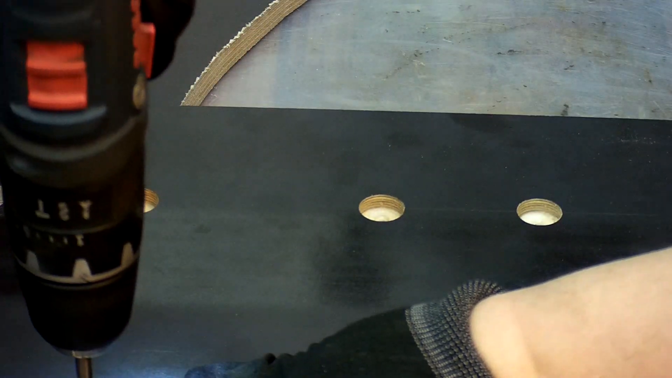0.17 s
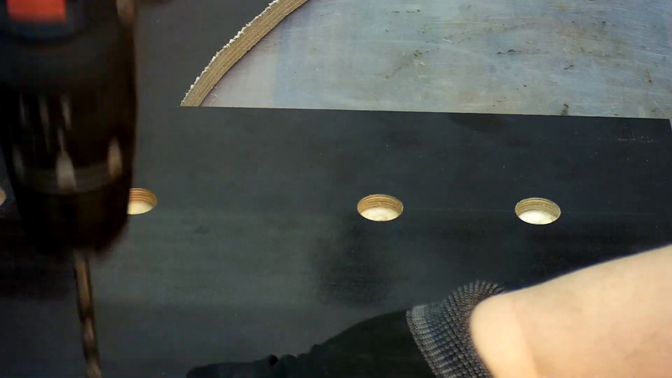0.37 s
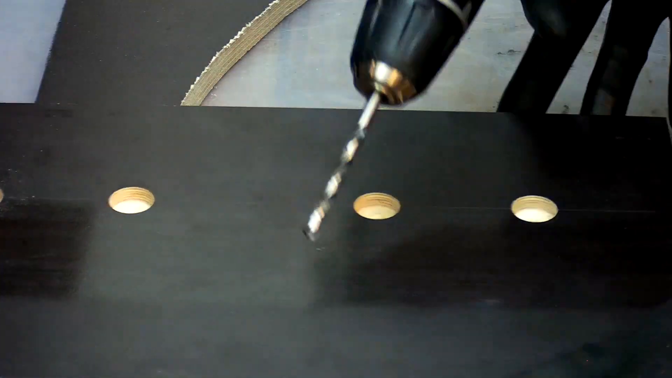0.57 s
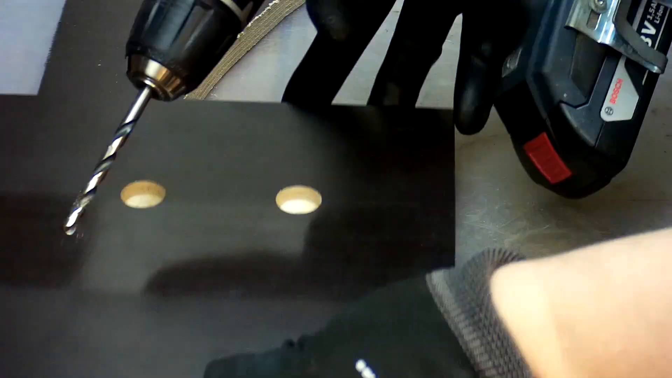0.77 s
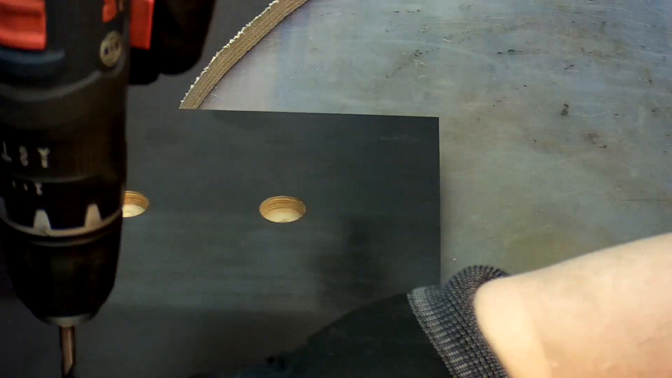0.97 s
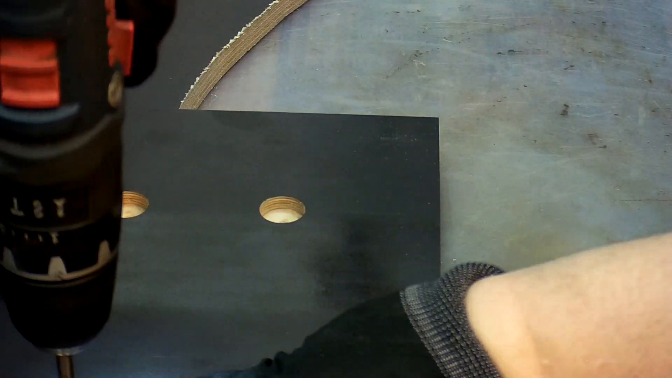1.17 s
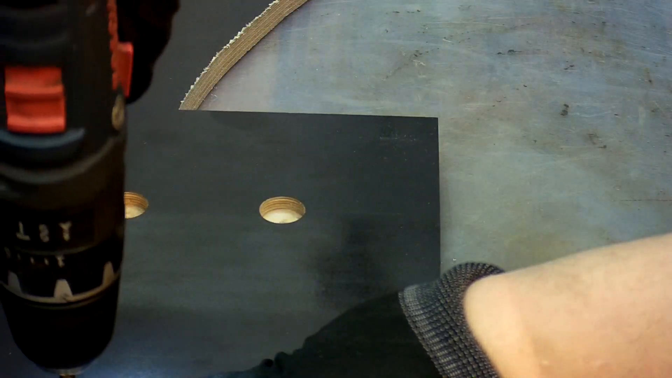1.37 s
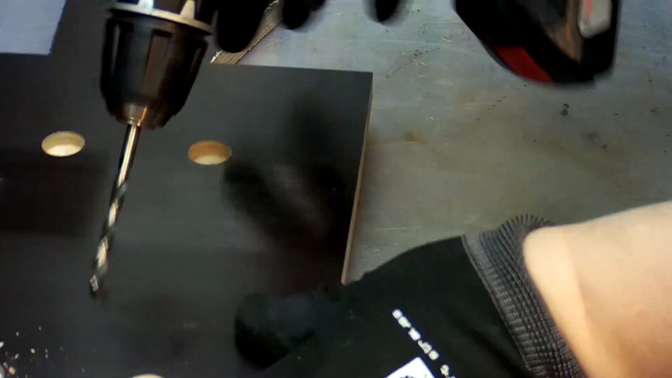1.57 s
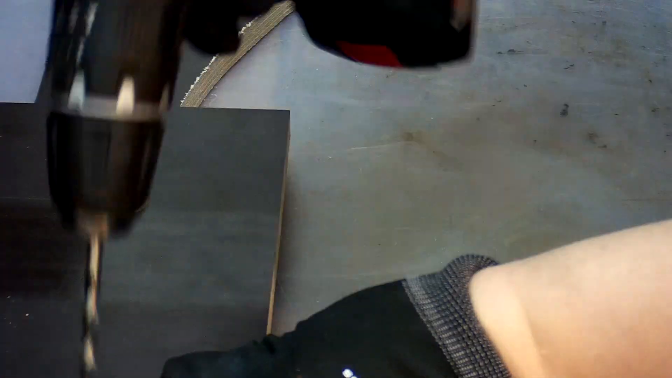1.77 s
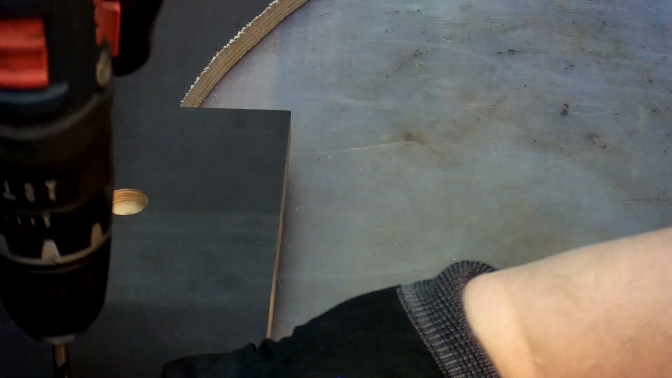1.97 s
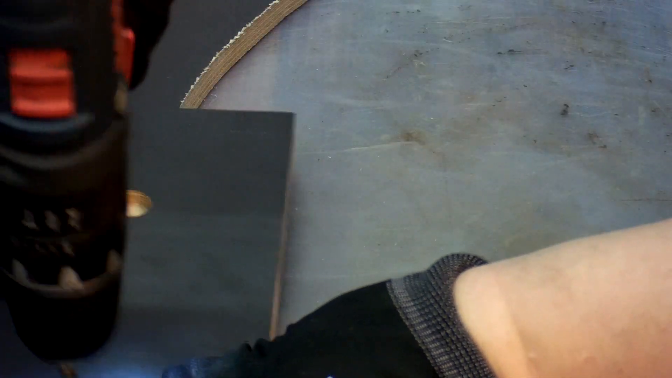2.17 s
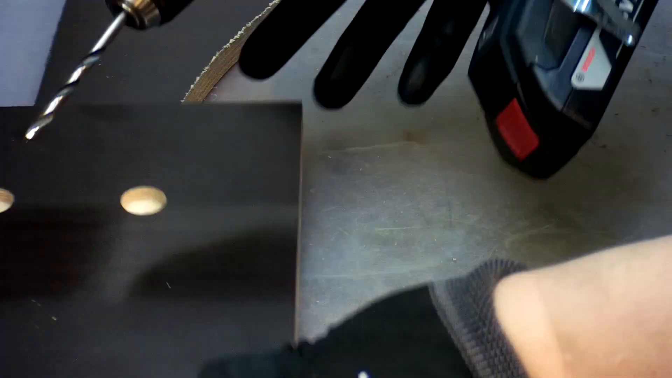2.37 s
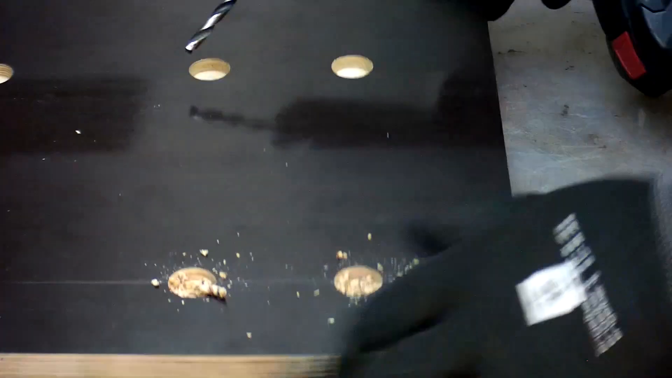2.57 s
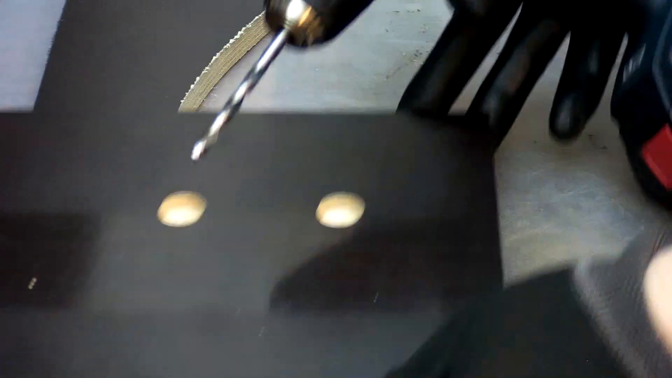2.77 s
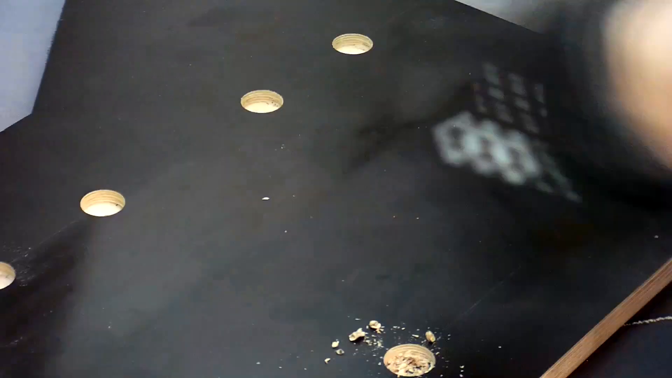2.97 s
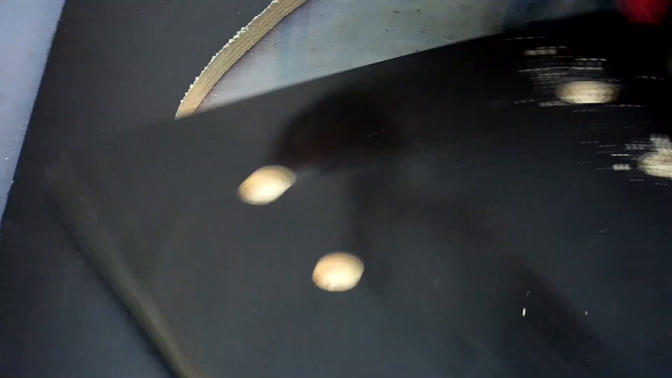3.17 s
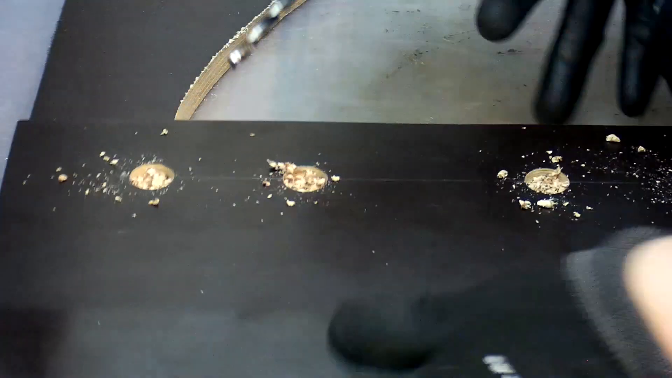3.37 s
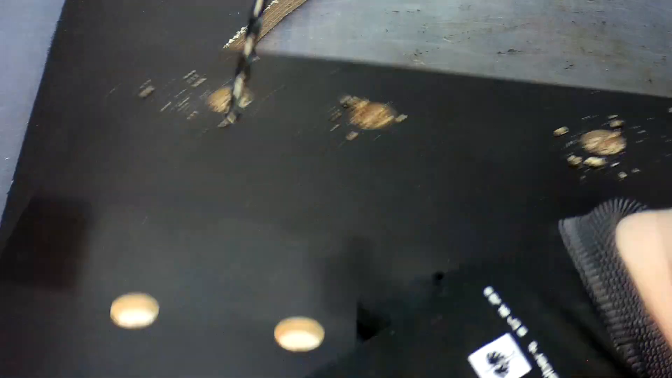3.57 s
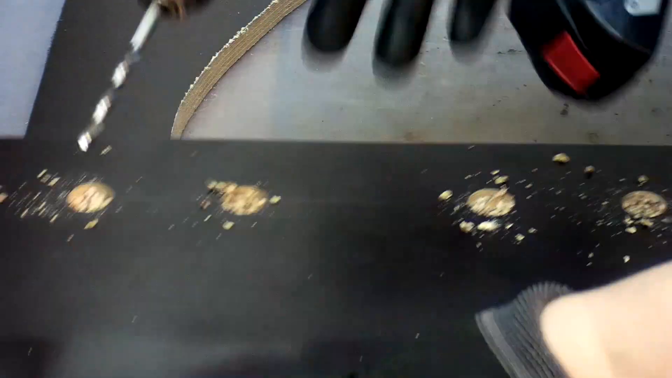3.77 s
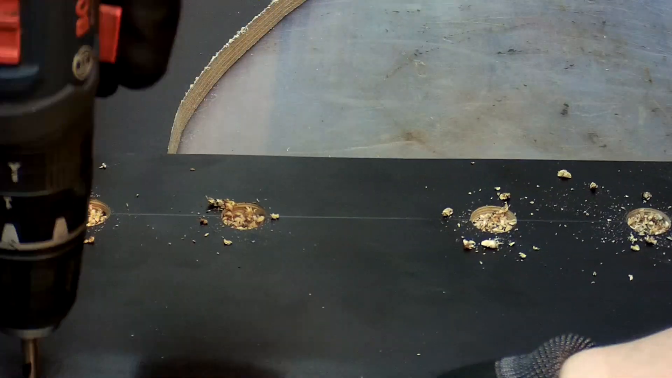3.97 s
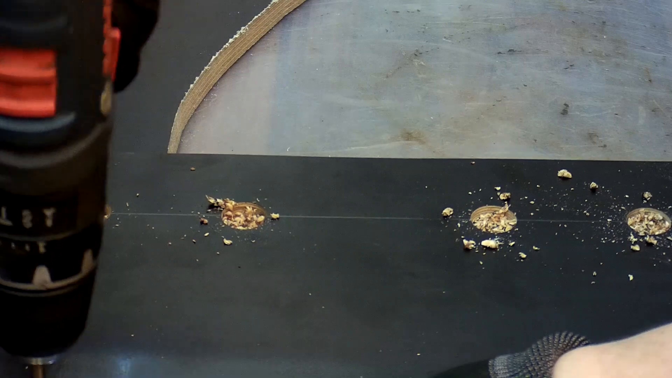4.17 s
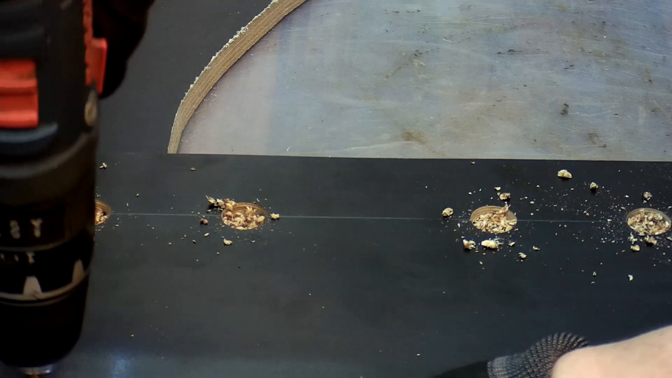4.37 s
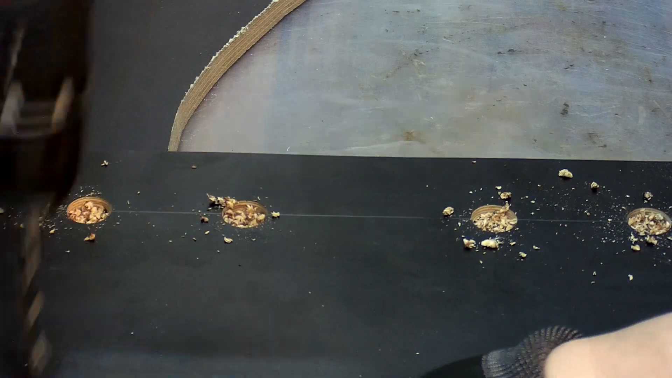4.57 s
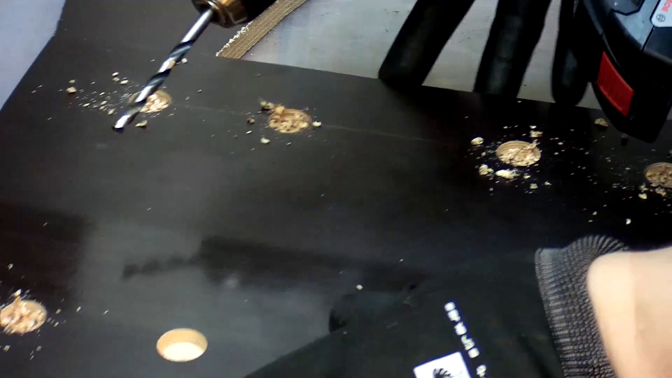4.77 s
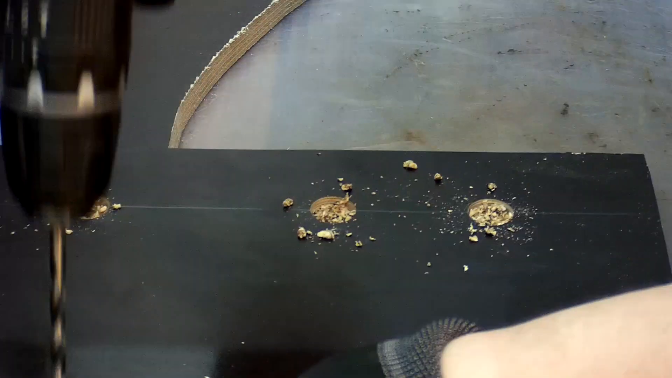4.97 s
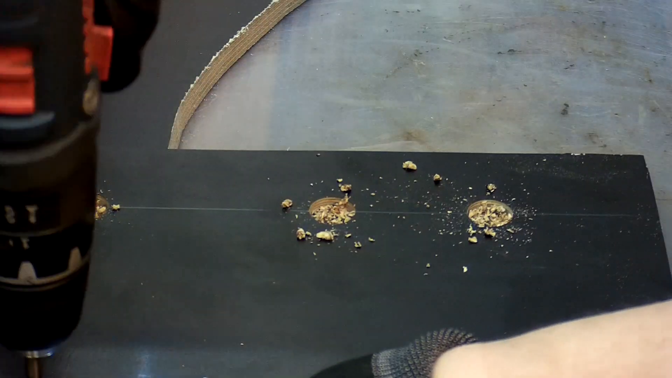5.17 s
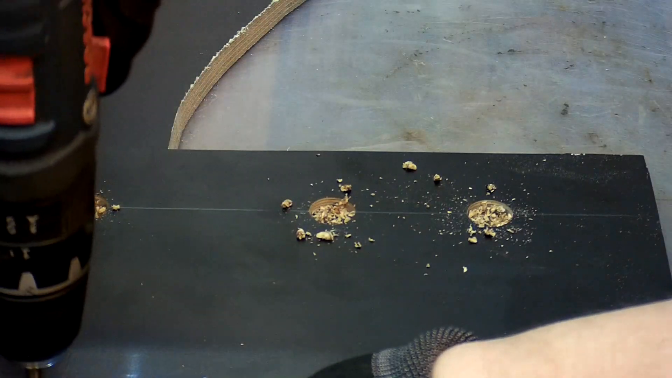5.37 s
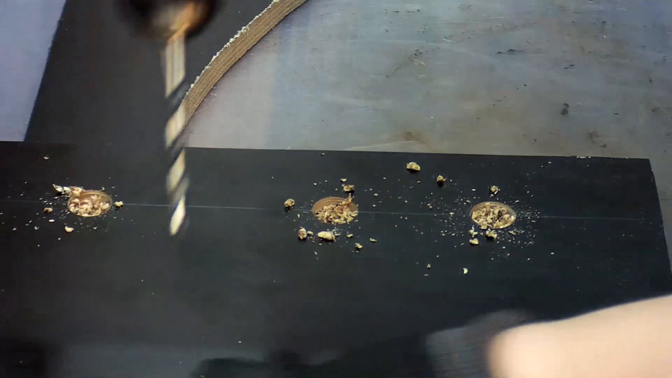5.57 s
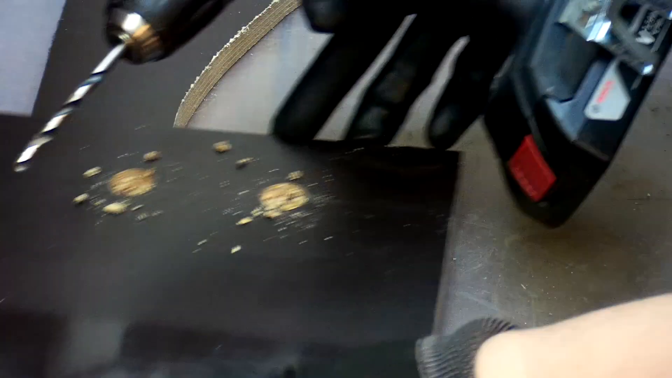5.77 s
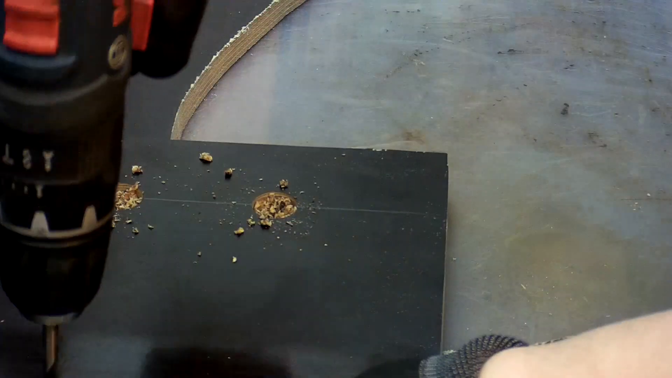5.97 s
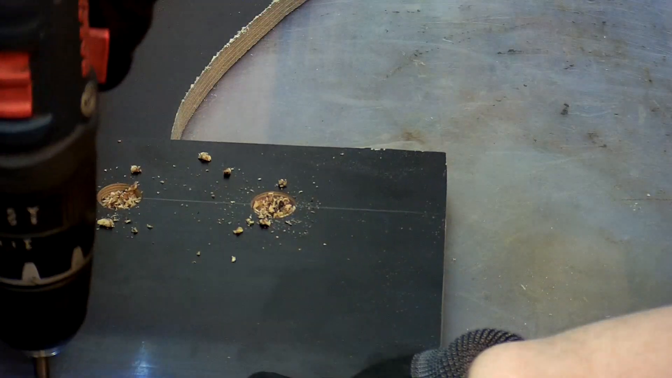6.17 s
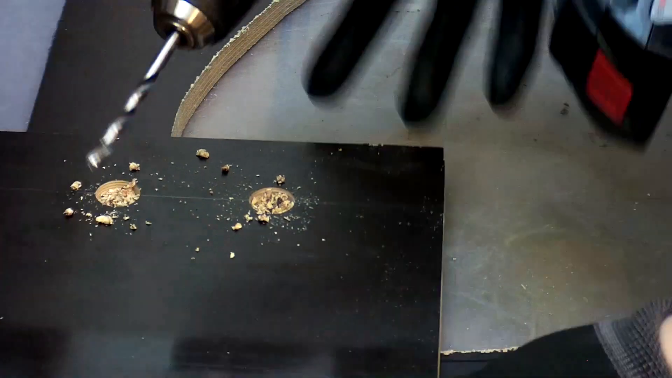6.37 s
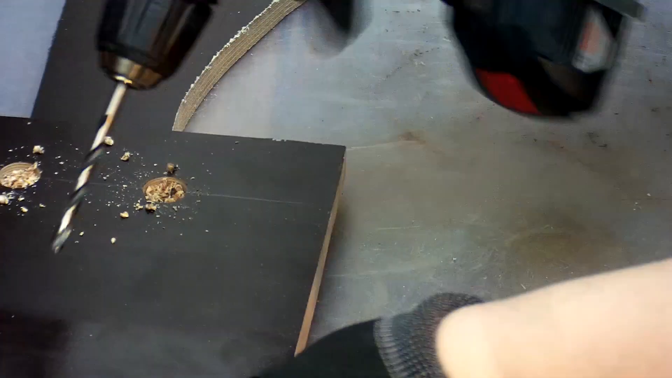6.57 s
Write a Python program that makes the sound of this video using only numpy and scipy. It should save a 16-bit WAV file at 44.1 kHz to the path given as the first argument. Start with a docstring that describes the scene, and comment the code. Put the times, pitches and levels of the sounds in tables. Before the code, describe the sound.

A cordless drill bores six holes in plywood on a steel bench, close to one microphone over faint workshop air. Each burst lasts under half a second: the gears whine and sag in pitch, fibres tear with a bright hiss, and the bit catches with dry clacks. The first three bursts come at the very start, at 1.1 and at 2.0 seconds, with light knocks and short scrapes between them and a hard knock at 2.2. From about 2.4 to 3.8 seconds the board is shuffled over the steel with knocks and gritty slides, its edge screeching briefly around 2.9 and 3.2 seconds. Three more bursts follow at 4.2, 5.2 and 6.1 seconds, separated by soft scrapes. Two quick slides around 6.5 seconds lead to a last hard knock at 6.6. The sound is dry, with very little room echo.

```python
"""Over quiet workshop air, a cordless drill bores six holes in plywood on a steel bench, in quick succession.
In each short burst the bit catches, the gears whine and sag under load, and tearing fibres ring the board and
bench until the bit breaks through. Between holes the board is knocked and slid over the steel. After the third
hole comes a longer shuffle, where its edge sticks and slips in brief screeches. Three more holes follow, then
two quick slides and a last hard knock, all close to one microphone."""
import sys
import numpy as np
from scipy import signal
from scipy.fft import rfft, irfft, next_fast_len
from scipy.io import wavfile
from scipy.ndimage import uniform_filter1d

SR = 44100
rng = np.random.default_rng(int(sys.argv[2]) if len(sys.argv) > 2 else 0)


def master_out(mix):
    """Clip the mix to full scale and print it as 16-bit PCM to the path in sys.argv[1]."""
    frames = np.transpose(np.atleast_2d(mix))
    ceiling = np.clip(frames, -1, 1)
    pcm = np.round(ceiling * 32767).astype(np.int16)
    wavfile.write(sys.argv[1], SR, pcm)


N = 295470


def amp(db):
    """Decibels to gain."""
    return 10 ** (np.asarray(db) / 20)


def unit(x):
    """Scale to rms 1."""
    return x / np.sqrt(np.mean(x ** 2) + 1e-20)


def eq_curve(points, hz):
    """EQ gain in dB: breakpoints joined on a log frequency axis."""
    point_hz, point_db = np.transpose(points)
    return np.interp(np.log(hz + 1), np.log(point_hz), point_db)


def bell(hz, centre_hz, width_hz):
    """Power response of one resonance."""
    return 1 / (1 + (2 * (hz - centre_hz) / width_hz) ** 2)


def resonant(modes, hz):
    """Response in dB of resonances standing on a flat base."""
    return 10 * np.log10(1 + sum(amp(db) ** 2 * bell(hz, centre, width) for centre, width, db in modes))


def colour(x, gain_db):
    """Minimum-phase EQ; gain_db is a function of frequency."""
    size = 2 * next_fast_len(len(x) // 2 + 4096)
    cepstrum = irfft(np.log(amp(gain_db(np.fft.rfftfreq(size, 1 / SR))) + 1e-6))
    cepstrum[1:size // 2] *= 2
    cepstrum[size // 2 + 1:] = 0
    return irfft(rfft(x, size) * np.exp(rfft(cepstrum)))[:len(x)]


def wobble(rate):
    """Smooth random modulation, rate knots a second."""
    knots = rng.standard_normal(int(N * rate / SR) + 4)
    curve = signal.resample(knots, len(knots) * 8)
    return np.interp(np.arange(N) * rate / SR * 8, np.arange(len(curve)), curve)


def ramp(t, start, length):
    """Rises from 0 to 1 over length seconds."""
    return np.clip((t - start) / length, 0, 1)


def grains(rate, spread_db):
    """Tiny snaps of uneven size, about rate a second."""
    chance, size, sign = rng.random(N), rng.exponential(size=N), rng.standard_normal(N)
    return unit((chance < rate / SR) * amp(spread_db * np.minimum(size, 4)) * np.sign(sign))


def patchy(x, depth_db):
    """Narrow resonances that come and go as the point of contact moves."""
    spectrum = signal.stft(x, nperseg=512)[2]
    patches = uniform_filter1d(rng.standard_normal(spectrum.shape), size=3, axis=0)
    patches = uniform_filter1d(patches, size=18, axis=1)
    return unit(signal.istft(spectrum * amp(depth_db * unit(patches)), nperseg=512)[1][:N])


# room tone EQ: f/Hz, level/dB
AIR_EQ = [(12, -47), (20, -12.5), (145, -10.5), (181, -7), (268, -8.5), (355, -6.5), (496, -6.5),
          (754, -8.5), (819, -8), (1210, -9.5), (15800, -30.5)]


def air():
    """The bed: a steady room rush with a faint hollow tone."""
    tone_db = lambda hz: eq_curve(AIR_EQ, hz) + 3.0 * bell(hz, centre_hz=760, width_hz=69)
    return amp(-67) * unit(colour(rng.standard_normal(N), tone_db))


# drill cues, one per hole: touch t/s, spin-up t/s, break-through t/s, trigger off t/s, rise to full load
# t/s, entry whine f/Hz, deep whine f/Hz, free whine f/Hz, whine level/dB, cut level/dB, hiss level/dB
HOLES = [(0.008, 0.055, 0.365, 0.41, 0.17, 2958, 2407, 3150, -60.5, -48.5, -44.5),
         (1.133, 1.169, 1.42, 1.482, 0.12, 3837, 3365, 4000, -44.5, -47, -41.5),
         (2.036, 2.06, 2.245, 2.306, 0.059, 4133, 3740, 4150, -44.5, -48, -43.5),
         (4.187, 4.261, 4.545, 4.61, 0.17, 4056, 3777, 4108, -43, -47.5, -43.5),
         (5.198, 5.276, 5.538, 5.576, 0.18, 3340, 3053, 3600, -49, -48, -44),
         (6.086, 6.102, 6.3, 6.324, 0.14, 4510, 3995, 4080, -47.5, -45.5, -40)]


def drill():
    """Load builds as the bit sinks: the motor sags and the cut grows, until break-through frees it."""
    t = np.arange(N) / SR
    tip_load, ripple_hz = 0.35, 11.3
    spin_up_s, brake_s = 0.01, 0.007  # time constants
    free_whine_db, exit_cut_db, exit_hiss_db = -52, -13.5, -8.5
    whine_hz, whine, cut, hiss = np.zeros((4, N))
    for touch, spin, through, stop, bite_s, entry_hz, deep_hz, free_hz, whine_db, cut_db, hiss_db in HOLES:
        load = tip_load + (1 - tip_load) * ramp(t, spin, bite_s) ** 0.76
        breakout = ramp(t, through, stop - through)
        freed = breakout ** 2
        brake = np.exp(-np.maximum(t - stop, 0) / brake_s)
        running = (t > spin) & (brake > amp(-30))
        spin_up = 1 - 0.22 * np.exp(-np.maximum(t - spin, 0) / spin_up_s)
        # drag on the bit comes and goes, rippling the speed
        ripple = 1 + 0.01114 * (1 - freed) * np.sin(2 * np.pi * ripple_hz * (t - spin - spin_up_s))
        sag_hz = (entry_hz - deep_hz) * ramp(t, spin, through - spin) ** 0.7
        recovery_hz = (free_hz - deep_hz) * breakout
        whine_hz += running * spin_up * ripple * (entry_hz - sag_hz + recovery_hz)
        singing = running * ramp(t, spin, length=0.0061) * brake ** 2
        whine += singing * load ** 0.77 * amp(whine_db + freed * (free_whine_db - whine_db))
        burst = ramp(t, touch, length=0.023) * brake
        cut += burst * load ** 0.67 * amp(cut_db + freed * exit_cut_db)
        hiss += burst * load * amp(hiss_db + freed * exit_hiss_db)
    feed_sway = 1 + 0.003 * wobble(40)  # feed pressure bends the pitch
    return gears(whine_hz * snags(t) * feed_sway, whine, hiss) + cutting(cut, hiss)


# resonances of the board on the bench: f/Hz, width/Hz, level/dB over the flat base
BOARD_MODES = [(346, 35, 8), (628.4, 25, 12.5), (756.2, 36.5, 19), (1020.4, 39, 16), (1325, 39, 12.5),
               (1715, 164, 12), (2152, 137, 10.5), (2430, 95, 7.5), (3250, 64, 5.5), (3790, 220, 6.5),
               (4580, 420, 0.5), (6370, 210, 2)]


def board(hz):
    """The ring of board and bench, as EQ in dB for cuts, hits and scrapes."""
    return resonant(BOARD_MODES, hz)


# EQ of the tearing fibres: f/Hz, level/dB
TEAR_EQ = [(100, -21), (330, -14.5), (520, -14), (750, -8), (1300, -1.5), (1480, -5), (1750, 0.5),
           (2500, 0), (4000, 1), (5500, -10), (9000, -51)]
# EQ of the chip hiss: f/Hz, level/dB
CHIP_EQ = [(1500, -39.5), (3000, -16), (5000, -1), (8500, -0.5), (11000, -1), (12700, -4), (14500, 1.5),
           (15800, 2)]


def cutting(cut, hiss):
    """Fibres tear in clumps and ring the board; the chips hiss on top."""
    clumps = wobble(130)
    fibres = grains(rate=7000, spread_db=4.0) * amp(1.03 * clumps)
    tearing = unit(colour(fibres, lambda hz: eq_curve(TEAR_EQ, hz) + board(hz)))
    spray = grains(rate=19000, spread_db=4.0) * amp(0.87 * clumps)
    chips = colour(spray, lambda hz: eq_curve(CHIP_EQ, hz) + board(hz))
    return cut * tearing + amp(1.94) * hiss * patchy(chips, depth_db=2.1)


def blow(start, db, thud_db, tick_db):
    """A sharp hit and short chatter ring the board; thud and tick are set against the mid clack."""
    out, t = np.zeros(N + SR), np.arange(SR // 4) / SR
    # thud, clack, tick: band f/Hz, 60 dB decay t/s, level/dB
    layers = [((440, 1440), 0.079, thud_db + 0.0051), ((1580, 3860), 0.05, -1.96),
              ((3550, 10600), 0.082, tick_db - 1.4)]
    for band_hz, t60, layer_db in layers:
        chatter = rng.standard_normal(len(t)) * (amp(-60 * t / t60) + amp(-60 * t / 0.0021))
        band = signal.sosfilt(signal.butter(2, band_hz, "band", fs=SR, output="sos"), chatter)
        ring = colour(band, board)
        attack_rms = np.std(ring[:SR // 125])
        out[round(start * SR):][:len(t)] += amp(db + layer_db) * ring / attack_rms
    return out[:N]


# bit clack cues, as it catches and as it breaks through: t/s, level/dB
BIT_CLACKS = [(0.016, -46.5), (0.382, -41), (1.136, -41.5), (1.442, -41), (2.049, -36.5), (2.278, -42.5),
              (4.18, -51), (5.456, -38), (6.096, -36.5), (6.309, -40)]


def bit_clacks():
    """The bit clacks dryly as it catches in the wood, and again as it breaks through."""
    return sum(blow(start, db, thud_db=-11, tick_db=-12.5) for start, db in BIT_CLACKS)


# partials of motor and gears: multiples of the shaft speed
GEAR_ORDERS = [4, 9.4, 20, 24, 27.5, 36.8, 39.2, 48]
# balance of those partials: level/dB
GEAR_LEVELS = [-17, -16, -24, -21.5, -13.5, -11.5, -12, -9]
# resonances of the drill's housing: f/Hz, width/Hz, level/dB over the flat base
HOUSING_MODES = [(1304, 32, 12), (3154, 180, 6)]


def gears(whine_hz, whine, hiss):
    """Meshing teeth sing the lead tone; more shaft partials ride the hiss envelope and ring the housing."""
    mesh_order = 12
    shaft_hz = whine_hz / mesh_order * (1 + 0.006 * wobble(220))  # the load shakes the speed
    shaft = 2 * np.pi * np.cumsum(shaft_hz) / SR
    mesh = whine * np.sqrt(2) * np.sin(mesh_order * shaft) * amp(2.3 * wobble(130))
    partials = np.zeros(N)
    for order, db in zip(GEAR_ORDERS, GEAR_LEVELS):
        gain = amp(db + 3 * wobble(70))
        backlash = (0.35 + 0.017 * order) * wobble(260)  # blurs the high partials most
        partials += gain * np.sin(order * shaft + backlash)
    # uneven teeth repeat once a turn: a comb of weak partials that come and go
    comb = sum(wobble(25) * np.sin(order * shaft + rng.uniform(0, 2 * np.pi)) for order in range(9, 36))
    whirr = hiss * (whine_hz > 0) * (partials + amp(-11) * unit(comb))
    return mesh + colour(whirr, lambda hz: resonant(HOUSING_MODES, hz))


# knock cues: t/s, level/dB, hardness/dB (more tick, less thud)
KNOCKS = [(0.59, -69, 11.5), (0.652, -65, -4.5), (1.1, -62, -11.5), (1.546, -62.5, -0.5),
          (1.622, -59.5, -3.5), (1.85, -60.5, -3.5), (1.942, -71.5, -4), (2.031, -62, -8.5),
          (2.226, -36, 0.5), (2.427, -53.5, -0.5), (2.586, -46.5, 2), (2.63, -52, 0), (2.704, -67, -1),
          (2.879, -41, 10), (2.992, -46, -2.5), (3.41, -59.5, 4), (4.16, -67, -9.5), (4.603, -61, 17),
          (6.077, -60.5, -4.5), (6.591, -38, 1.5)]


def knocks():
    """Knocks and bumps around the work, mostly the board on the bench, from dull thuds to hard ticks."""
    return sum(blow(start, db, thud_db=-1.5 - hard, tick_db=-6 + hard) for start, db, hard in KNOCKS)


def snags(t):
    """Share of the drill's speed left as knocks jam the bit: the louder, the deeper the pitch dip."""
    depth, lag_s, width_s = 0.085, 0.0094, 0.016
    loudest = max(db for _, db, _ in KNOCKS)
    jolts = sum(amp(db - loudest) * np.exp(-((t - start - lag_s) / width_s) ** 2) for start, db, _ in KNOCKS)
    return 1 - depth * jolts


# board slide cues: start t/s, end t/s, level/dB, sizzle level/dB against the scrape
SLIDES = [(0.642, 0.703, -54.5, -2), (0.755, 0.83, -58, -4), (1.577, 1.644, -57, 6.5),
          (1.696, 1.75, -56.5, -1), (2.486, 2.553, -41.5, -9), (2.591, 2.614, -48.5, -14),
          (2.777, 2.841, -53.5, 7.5), (2.899, 2.945, -41.5, -12), (2.942, 2.991, -49, -5),
          (3.09, 3.112, -57, -2), (3.163, 3.233, -48, 3.5), (3.286, 3.365, -51, -2), (3.43, 3.465, -60, -4),
          (3.511, 3.546, -56, -1), (3.583, 3.63, -54, -3), (3.741, 3.789, -58.5, -2),
          (3.815, 3.839, -62.5, -12), (4.705, 4.754, -57, -29), (4.83, 4.946, -63, -12),
          (5.678, 5.721, -50.5, 1), (5.766, 5.827, -53, 2), (6.442, 6.496, -54, 7.5),
          (6.519, 6.568, -53.5, 8.5)]
# EQ of the wood-on-steel scrape: f/Hz, level/dB
SCRAPE_EQ = [(100, -13), (350, -11.5), (750, -9.5), (1400, -5.5), (2200, -3.5), (3000, 5), (4800, 0.5),
             (7000, 3), (10400, 6.5), (12500, -5)]
# EQ of its top-end sizzle: f/Hz, level/dB
SIZZLE_EQ = [(8000, -27), (11500, -9.5), (12700, -15.5), (14000, -16), (15800, -4.5)]


def slides():
    """Each push drags the board over gritty, ringing steel, swelling and dying with its speed."""
    t = np.arange(N) / SR
    scrape_power, sizzle_power = np.zeros((2, N))
    for start, end, db, sizzle_db in SLIDES:
        off_centre = np.abs(t - (start + end) / 2) / ((end - start) / 2 + 0.0012)
        push = amp(db) ** 2 / (1 + off_centre ** 2.1 + off_centre ** 10)
        scrape_power += push
        sizzle_power += push * amp(sizzle_db) ** 2
    grit = lambda: grains(rate=14000, spread_db=2.0) * amp(1.7 * wobble(110))
    scrape = unit(colour(grit(), lambda hz: eq_curve(SCRAPE_EQ, hz) + board(hz)))
    scrape = patchy(scrape, depth_db=2.8)
    sizzle = unit(colour(grit(), lambda hz: eq_curve(SIZZLE_EQ, hz)))
    steel = unit(colour(grit(), lambda hz: 20 * np.log10(bell(hz, centre_hz=3620, width_hz=190))))
    return np.sqrt(scrape_power) * (scrape + amp(-22.5) * steel) + np.sqrt(sizzle_power) * sizzle


# screech cues: t/s, length/s, f/Hz, level/dB
SCREECHES = [(2.878, 0.022, 2250, -47), (2.902, 0.042, 2594, -42), (2.933, 0.025, 2110, -42),
             (3.163, 0.018, 2800, -46)]


def screech():
    """The board's edge sticks and slips on the steel: short, rough, sagging tones with overtones."""
    out, t = np.zeros(N), np.arange(N) / SR
    sag_hz_per_s = 2300
    for start, length, hz, db in SCREECHES:
        progress = ramp(t, start, length)
        pitch_hz = (hz - sag_hz_per_s * length * progress) * (1 + 0.0245 * wobble(900))
        phase = 2 * np.pi * np.cumsum(pitch_hz) / SR
        tone = sum(amp(-4.5 * k) * np.sin((k + 1) * phase) for k in range(4))
        swell = np.sqrt(np.abs(np.sin(np.pi * progress)))
        out += swell * amp(db - 5.0 + 3.6 * wobble(400)) * unit(tone)
    return out


def workshop(x, t60=0.1):
    """The room's reflections: a short, tight reverb tail."""
    t = np.arange(SR // 3) / SR
    tail = rng.standard_normal(len(t)) * amp(-60 * t / t60) * (t > 0.003)
    return signal.fftconvolve(x, tail / np.linalg.norm(tail))[:N]


def scene():
    """The mix: close-up work with a touch of room over the air bed, alike in both channels."""
    work = drill() + slides() + screech() + bit_clacks() + knocks()
    mono = work + amp(-18) * workshop(work) + air()
    return np.array([mono, mono])


def record(dry):
    """A steep high cut on the whole mix."""
    top_hz, fade_hz = 15830, 160
    size = next_fast_len(N + SR // 2)
    passed = np.clip((top_hz - np.fft.rfftfreq(size, 1 / SR)) / fade_hz + 0.5, 0, 1)
    return irfft(rfft(dry, size) * passed, size)[:, :N]


dry = scene()
out = record(dry)
master_out(out)
```